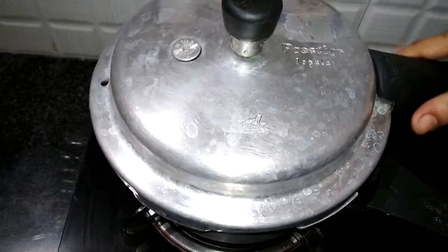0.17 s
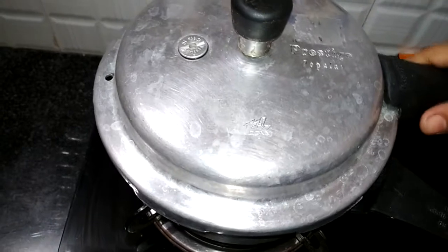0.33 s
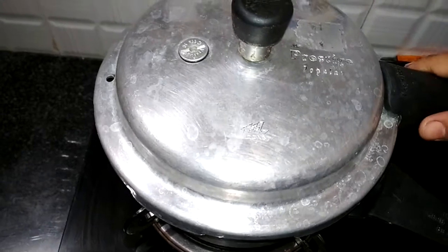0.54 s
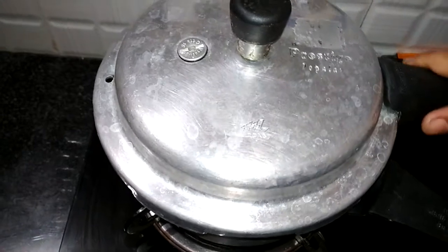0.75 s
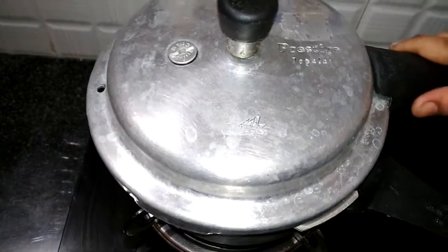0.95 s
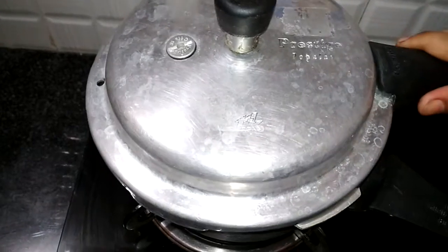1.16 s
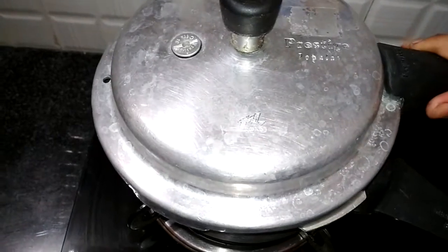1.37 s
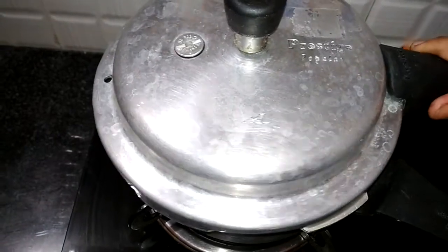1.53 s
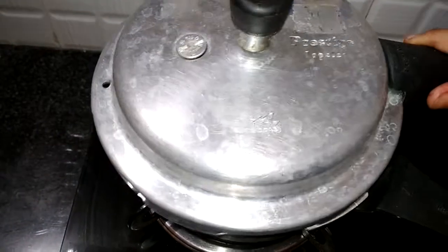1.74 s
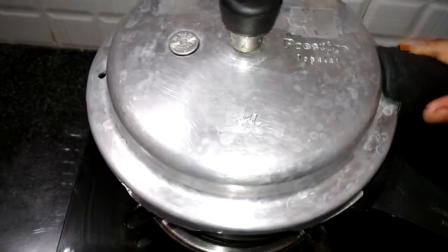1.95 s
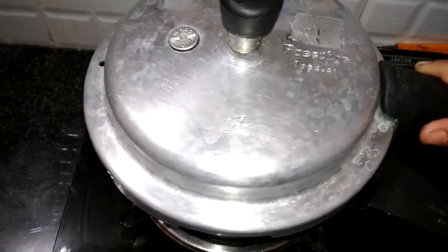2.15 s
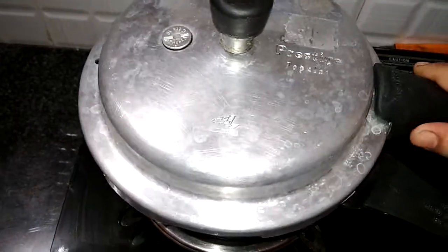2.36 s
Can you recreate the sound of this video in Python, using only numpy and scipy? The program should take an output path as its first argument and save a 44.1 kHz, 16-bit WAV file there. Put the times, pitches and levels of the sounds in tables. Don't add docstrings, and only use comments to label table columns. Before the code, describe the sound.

Close up in a small hard-walled kitchen, a thick aluminium lid is worked onto a pot: an early scrape and sharp clink, sparse taps, soft hollow thumps, a short gasket squeak, then more scraping and clanking.

```python
import sys
import numpy as np
from scipy import signal
from scipy.fft import rfft, irfft
from scipy.io import wavfile
from scipy.ndimage import uniform_filter1d

SR = 44100
rng = np.random.default_rng(int(sys.argv[2]) if len(sys.argv) > 2 else 0)


def gain_from_db(level_db):
    decades = np.asarray(level_db, float) / 20
    return 10 ** decades


def generate_wav(signal):
    frames = np.transpose(np.atleast_2d(signal))
    scaled = np.clip(frames, -1, 1) * 32767
    pcm = np.round(scaled).astype(np.int16)
    wavfile.write(sys.argv[1], SR, pcm)


N = 110250
STRIKE_N = 10000


def rms_one(x):
    return x / np.sqrt(np.mean(x ** 2) + 1e-20)


def at_hz(points, hz):
    table_hz, value = np.array(points)[:, 0], np.array(points)[:, 1]
    return np.interp(np.log(hz), np.log(np.maximum(table_hz, 1)), value)


def at_time(level_db, offset_db=0):
    s, db = np.transpose(level_db)
    return gain_from_db(np.interp(np.arange(N) / SR, s, db) + offset_db)


def filtered(x, order, hz, kind="low"):
    return signal.sosfilt(signal.butter(order, hz, kind, fs=SR, output="sos"), x)


def fold(a, b):
    return signal.fftconvolve(np.atleast_2d(a), np.atleast_2d(b), axes=1)


def add(out, sound, s):
    i = int(s * SR)
    sound, i = sound[..., max(-i, 0):], max(i, 0)
    n = min(sound.shape[-1], N - i)
    out[:, i:i + n] += sound[..., :n]


# (frequency [Hz], density [dB per Hz])
FLOOR = [(12, -38), (20, 4), (210, -21.5), (388, -15), (607, -24.5), (1910, -37), (2390, -31), (13200, -24),
         (16000, -29.5)]


def hush():
    floor_db = -68
    hz = np.maximum(np.fft.rfftfreq(N, 1 / SR), 1)
    both, own = rfft(rng.standard_normal(N)), rfft(rng.standard_normal((2, N)))
    share = .9 / (1 + (hz / 1500) ** 2)
    noise = np.sqrt(share) * both + np.sqrt(1 - share) * own
    return gain_from_db(floor_db) * rms_one(irfft(noise * gain_from_db(at_hz(FLOOR, hz)) * (hz > 60), N))


# (time [s], level [dB])
HANDLING = [(0, -89), (.15, -60), (.35, -62), (0.599, -71), (1.2, -73.5), (2.2, -77.5)]


def handling():
    noise = rng.standard_normal((3, N))
    low = filtered(noise[2] + 0.85 * noise[:2], 2, [18, 75], "band")
    return rms_one(low) * at_time(HANDLING)


def kitchen(x):
    t60_s, rise_s, wall_cut_hz = 0.27, 0.0037, 14800
    t = np.arange(SR // 2) / SR
    tail = rng.standard_normal((3, len(t))) * gain_from_db(-60 * t / t60_s) * (1 - np.exp(-t / rise_s))
    low = filtered(tail, 2, 600)
    tail = tail[:2] - low[:2] + 0.91 * low[2] + 0.75 * low[:2]
    tail = signal.lfilter(*signal.butter(1, wall_cut_hz, fs=SR), tail)
    return fold(x, tail / np.sqrt(np.sum(tail ** 2) / 2))[:, :N]


# (time [s], pitch [Hz], level [dB])
SQUEAK = [(1.425, 449.3, -70), (1.442, 441.6, -54), (1.455, 446, -64), (1.472, 461, -41.5),
          (1.484, 462, -40), (1.492, 480, -57.5), (1.506, 502, -44.5), (1.53, 457, -52), (1.55, 465, -70)]


def gasket():
    second_db, third_db, jitter = 2.5, -20, 0.027
    s, hz, db = np.transpose(SQUEAK)
    t = np.arange(N) / SR
    waver = rms_one(uniform_filter1d(rng.standard_normal(N), size=200))
    phase = 2 * np.pi * np.cumsum(np.interp(t, s, hz) * (1 + jitter * waver)) / SR
    wave = np.sin(phase) + gain_from_db(second_db) * np.sin(2 * phase) + gain_from_db(third_db) * np.sin(3 * phase)
    return wave * gain_from_db(np.interp(t, s, db, left=-150, right=-150))


# (time [s], peak [dB], pitch [Hz], t60
# [s])
THUMPS = [(0.001, -34, 383, 0.08), (0.059, -26.5, 380.6, 0.056), (0.115, -38.5, 420, 0.1),
          (0.186, -33, 340.4, 0.13), (0.206, -32.5, 402, 0.17), (0.261, -20, 354.8, 0.095),
          (0.271, -24, 399.3, 0.13), (0.36, -46, 421.6, 0.4), (0.6, -39, 493, 0.057),
          (0.747, -35, 288, 0.048), (0.94, -39, 369.7, 0.3), (0.963, -28, 382.4, 0.12),
          (1.298, -51, 374, 0.18), (1.591, -29, 376.7, 0.11), (1.699, -26.5, 404, 0.076),
          (1.898, -32.5, 396, 0.044), (1.959, -46.5, 391, 0.25), (1.979, -24.5, 376, 0.066),
          (2.016, -19.5, 381, 0.037), (2.05, -40.5, 377, 0.068), (2.087, -30, 381, 0.055),
          (2.151, -24.5, 367, 0.1), (2.215, -22, 375.6, 0.06),
          (2, -32.5, 230, 0.056), (1.912, -31, 300, 0.034), (2.333, -48, 330, 0.07),
               (0.268, -28, 240, 0.098), (0.21, -43.5, 140, 0.12), (0.971, -31, 215, 0.16),
               (1.1, -47, 125, 0.1), (2.16, -45.5, 120, 0.35), (2.217, -42, 250, 0.12),
               (1.4, -37, 700, 0.059), (.602, -36, 550, 0.094), (.601, -34, 880, 0.05),
               (.604, -40, 1650, 0.069), (.602, -39, 2050, 0.092), (.93, -43.5, 770, 0.09),
               (0.002, -37.5, 480, 0.1), (0.16, -39.5, 490, 0.06), (0.272, -27, 700, 0.06),
               (0.746, -48, 900, 0.033), (0.826, -46, 1360, 0.047), (2.151, -21.5, 794, 0.067),
               (2.153, -33.5, 192, 0.1), (2.262, -45.5, 125, 0.11), (2.31, -51, 150, 0.071),
               (1.625, -47, 205, 0.063), (1.5, -38.5, 740, 0.05)]
# (time [s], peak [dB], pitch [Hz], t60 [s])
SOFT_THUMPS = [(0.166, -24, 399, 0.072), (0.229, -21, 406, 0.057), (0.41, -36, 275, 0.06),
               (0.43, -32, 302, 0.068), (0.45, -31, 407.6, 0.083), (0.465, -46, 110.8, 0.11),
               (1.02, -24, 339, 0.039), (1.114, -15.5, 373, 0.061), (1.15, -27.5, 367.8, 0.097),
               (2.017, -9, 393, 0.07), (0.822, -20.5, 387, 0.049), (0.85, -40, 388.3, 0.13),
               (1.335, -43.5, 701, 0.08), (1.498, -46, 1075, 0.038), (1.24, -57, 391, 0.059),
               (1.076, -44, 385, 0.066), (1.62, -42, 383, 0.24), (1.83, -37.5, 263, 0.06),
               (2.125, -27.5, 379, 0.05), (2.259, -23, 368.8, 0.068), (2.308, -23, 357, 0.047),
               (2.472, -29, 371.5, 0.11)]


def thumps():
    level_db, twin_ratio = 3.5, .935
    out, t = np.zeros((1, N)), np.arange(12000) / SR
    hard, soft = (THUMPS, 0.0027, -18), (SOFT_THUMPS, 0.0085, -29)
    for rows, rise_s, twin_db in (hard, soft):
        rise = (1 - np.exp(-t / rise_s)) ** 1.4
        for s, peak_db, hz, t60_s in rows:
            w, fade = 2 * np.pi * hz * t, gain_from_db(-60 * t / max(t60_s, .02))
            twin = gain_from_db(twin_db) * fade ** 0.47 * np.sin(twin_ratio * w)
            add(out, gain_from_db(peak_db + level_db) * rise * (fade * np.sin(w) + twin), s)
    wobble = rms_one(filtered(rng.standard_normal(N), 2, 60))
    return out[0] * (1 + 0.2 * wobble)


# (frequency [Hz], spread [rad])
WIDTH = [(300, 0.74), (800, 1.06), (1600, 1.81), (4000, 2.22)]
# (frequency [Hz], difference [dB])
LEAN = [(60, -2), (700, -6.5), (1500, 0.4), (5000, -6), (9000, 2), (13000, 0.5)]


def metal_modes():
    hz = np.maximum(np.fft.rfftfreq(STRIKE_N, 1 / SR), 1)
    turn = at_hz(WIDTH, hz) * rms_one(uniform_filter1d(rng.standard_normal(len(hz)), size=40)) / 2
    side = np.array([[1], [-1]])
    strength_db = 1.7 * rms_one(uniform_filter1d(rng.standard_normal(len(hz)), size=8))
    return hz, np.exp(1j * side * turn) * gain_from_db(side * at_hz(LEAN, hz) / 2 + strength_db)


# (frequency [Hz], level [dB], t60 [s])
LID = [(867, -6.5, 0.067), (1106, -14.5, 0.044), (1402, -6, 0.099), (2600, -23, 0.36), (4530, -17.5, 0.099),
       (5060, -18, 0.13), (5380, -4, 0.06), (6090, -20.5, 0.17), (7460, -28, 0.094), (8960, -12, .2),
       (10916, -10.5, 0.21), (11700, -17, .12), (11140, -17, 0.46), (12550, -14, 0.29)]
# (frequency [Hz], level [dB])
METAL = [(250, -2), (600, -4.5), (1100, 4), (1700, -4.5), (2600, -1), (3700, -15.5), (5300, -9),
         (8200, -19.5),
         (9800, -22), (11000, -12.5), (12300, -17), (13500, -21.5), (15800, -32.5)]
# (frequency [Hz], t60 [s])
METAL_T60 = [(250, 0.44), (800, 0.18), (3000, 0.27), (11000, 0.43), (16000, 0.41)]


def strike(hz, reach, tilt_db, damp_s):
    crack_db, crack_s, crowd_spread_db, pivot_hz = 7.5, 0.0048, 1.5, 1330
    lid_level_db, high_lid_db, lid_spread_db, lid_detune = -4, -13, 2.0, 0.0046
    t, centres_hz = np.arange(STRIKE_N) / SR, np.geomspace(250, 15500, 36)
    chance = rng.standard_normal((3, 36))

    def tilt(f):
        return tilt_db * np.log2(np.maximum(f / pivot_hz, 1))

    groups = np.exp(-(np.log(hz / centres_hz[:, None]) / .09) ** 2)
    crowd = irfft(rfft(rng.standard_normal(STRIKE_N)) * groups[:, None] * reach, STRIKE_N)
    t60_s = np.maximum(at_hz(METAL_T60, centres_hz) * gain_from_db(0.64 * chance[0]), .01)[:, None]
    fade = gain_from_db(-60 * t / t60_s) + gain_from_db(crack_db) * np.exp(-t / crack_s)
    crowd_db = at_hz(METAL, centres_hz) + tilt(centres_hz) + crowd_spread_db * chance[1]
    body = np.einsum("gt,gct->ct", gain_from_db(crowd_db)[:, None] * fade, crowd)

    lid_hz, lid_db, lid_t60_s = np.transpose(LID)
    lid_hz = lid_hz * (1 + lid_detune * chance[0, :len(LID)])
    bins = reach[:, (lid_hz * STRIKE_N / SR).astype(int), None]
    decay = np.log(1000) * t / np.maximum(lid_t60_s, .01)[:, None]
    rings = np.imag(bins * np.exp(2j * np.pi * lid_hz[:, None] * t - decay))
    lid_db = lid_db + lid_level_db + tilt(lid_hz) + high_lid_db * (lid_hz > 6000)
    body = body + gain_from_db(lid_db + lid_spread_db * chance[2, :len(LID)]) @ rings

    body = body * np.exp(-t / damp_s) * np.cos(np.pi / 2 * t / t[-1])
    return body / np.sqrt(np.mean(body[:, :200] ** 2))


# (time [s], level [dB])
DRAG = [(0, -100), (.16, -64), (.24, -43), (.45, -82.5), (.56, -101), (.945, -68), (0.979, -58),
        (1.1, -85.5), (1.44, -86.5), (1.501, -63), (1.62, -86.5), (1.694, -47.5), (1.802, -63.5),
        (1.949, -63), (2.0, -48.5), (2.139, -43.5), (2.299, -69.5), (2.421, -94)]


def scrape(hz, reach):
    grains_per_s, level_db, tilt_db, ring_s, judder_db = 2500, -2, 3.5, 0.005, 21
    size = gain_from_db(2.4 * np.minimum(rng.exponential(1, N), 4))
    grit = size * rng.choice([-1, 1], N) * (rng.random(N) < grains_per_s / SR)
    grit = rms_one(grit) * at_time(DRAG, level_db)
    body = strike(hz, reach, tilt_db, ring_s)
    judder = filtered(grit, 2, [120, 520], "band")
    return fold(grit, body / np.sqrt(np.sum(body ** 2) / 2))[:, :N] + gain_from_db(judder_db) * judder


# (time [s], peak [dB], brightness [dB per octave], chatter [ms], slide-in [ms])
CLINKS = [(0.001, -38.5, 0.5, 1.7, 0.12), (0.058, -31, -4.5, 2.4, 0.72), (0.116, -39, -10, 4.8, 0.16),
          (0.169, -37.5, -1, 2.6, 1.2), (0.210, -22, 4.5, 1, 4.2), (0.259, -18.5, 1.7, 3.6, .1),
          (0.2735, -6.5, 5.5, .8, 0.28), (0.462, -40, 7.5, 4.2, 4.0), (0.511, -41, 6, 8.4, 1.5),
          (0.6, -24, 2.5, 1.5, .2), (0.744, -53.5, -29, 1.6, .2), (0.826, -45.5, -12, 2.8, .2),
          (0.926, -34.5, 5.5, 6.6, 1.8), (0.9642, -17.5, 0.5, 0.66, 0.72), (1.114, -35.5, 1, 5, .6),
          (1.286, -38, -3, 4.2, 0.38), (1.302, -37, -3.5, 3.3, 1.9), (1.483, -33.5, 5.5, 13.7, 2.3),
          (1.591, -32, -0.5, 1.54, 0.54), (1.699, -19.5, 4.5, 1.7, 5.6), (1.779, -42, 22, 1.6, 0.85),
          (1.914, -37, 0, 7, .6), (1.973, -36, 0, 6.8, 1.5), (1.984, -25.5, 1.5, 1.3, 0.82),
          (2.018, -16.5, 2, 2.7, 1.86), (2.092, -30.5, 4, 1.3, 4.2), (2.133, -35.5, -8, 9, 1.5),
          (2.152, -8.5, 4, 2.1, .1), (2.215, -21.5, 2, 0.37, 1.1), (2.473, -42.5, -7.5, 11, 0.39),
          (1.741, -31.5, -12, 1.2, 1.6), (1.752, -38, -16, 2.3, 0.35), (1.671, -49, -10, 6.0, 6.0),
          (2.495, -45, 6, 1.5, 1.5)]


def clinks(hz, reach):
    level_db, damp_s, lead_n, touch_n = -7, 0.97, 400, 1500
    out, ms = np.zeros((2, N)), (np.arange(touch_n) - lead_n) * 1000 / SR
    for s, peak_db, tilt_db, chatter_ms, slide_ms in CLINKS:
        shape = np.exp(-np.abs(ms) / np.where(ms < 0, max(slide_ms, .05), max(chatter_ms, .3)))
        touch = rng.standard_normal(touch_n) * (rng.random(touch_n) < .05) * shape
        touch[lead_n] = 2
        touch = touch / np.sqrt(np.sum(touch ** 2))
        clink = fold(touch, strike(hz, reach, tilt_db, damp_s))
        add(out, gain_from_db(peak_db + level_db) * clink, s - lead_n / SR)
    return out


def scene():
    metal_room_db, pot_room_db = -11.5, -12
    modes = metal_modes()
    metal = clinks(*modes) + scrape(*modes)
    pot = thumps() + gasket()
    room = kitchen(gain_from_db(metal_room_db) * metal.mean(axis=0) + gain_from_db(pot_room_db) * pot)
    return metal + pot + room + hush() + handling()


def band_limit(x):
    return signal.sosfilt(signal.butter(12, 16470, fs=SR, output="sos"), x)


def record(dry):
    mix = signal.sosfilt(signal.cheby2(10, 45, 16050, fs=SR, output="sos"), dry)
    return band_limit(mix)


dry = scene()
out = record(dry)
generate_wav(out)
```